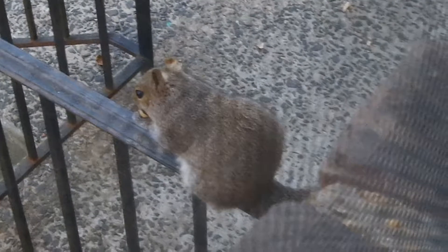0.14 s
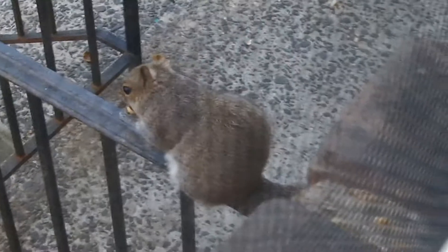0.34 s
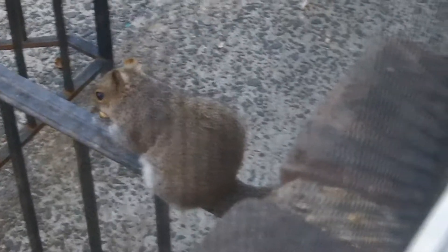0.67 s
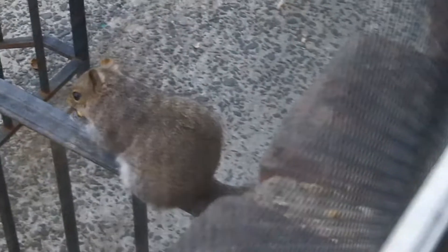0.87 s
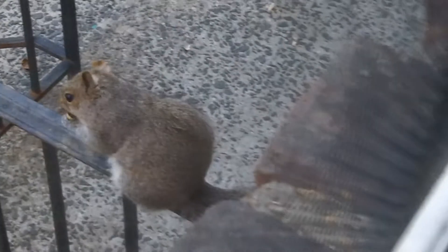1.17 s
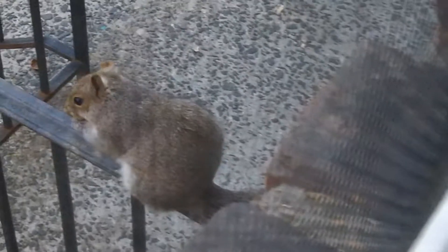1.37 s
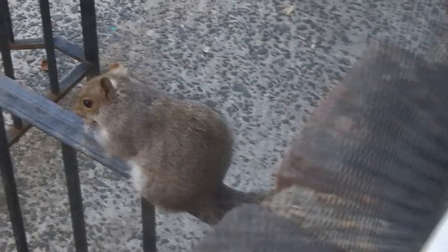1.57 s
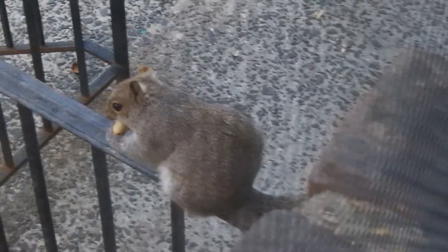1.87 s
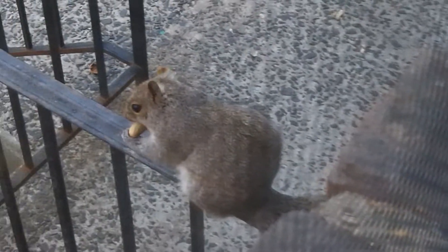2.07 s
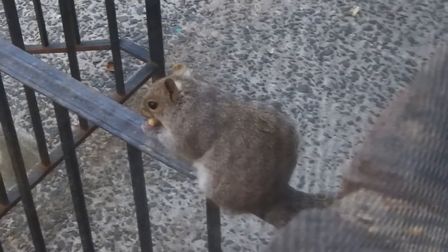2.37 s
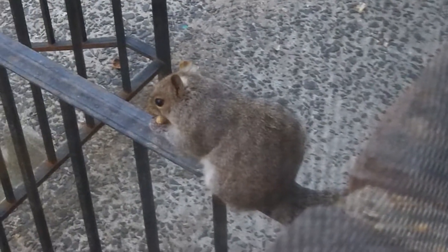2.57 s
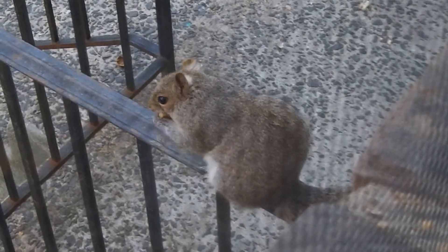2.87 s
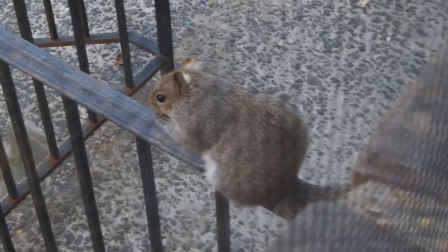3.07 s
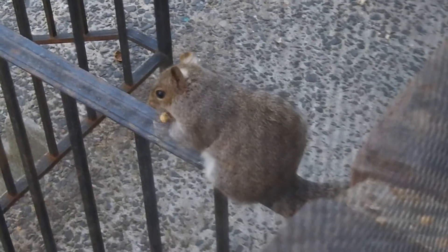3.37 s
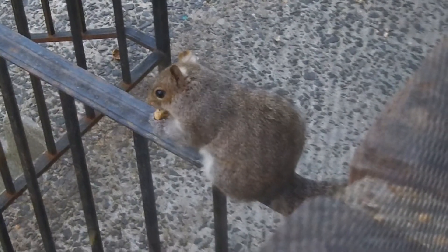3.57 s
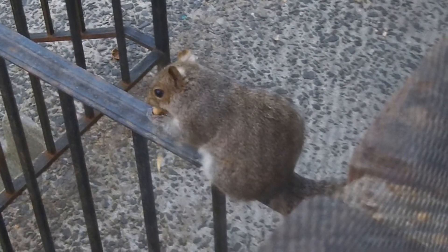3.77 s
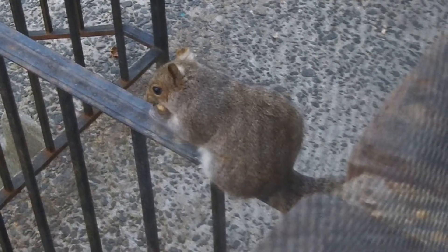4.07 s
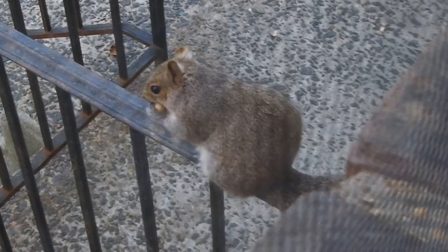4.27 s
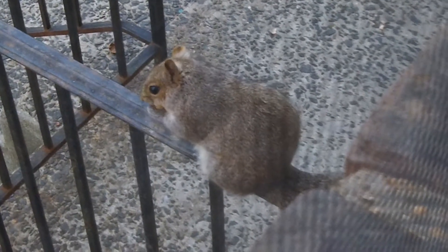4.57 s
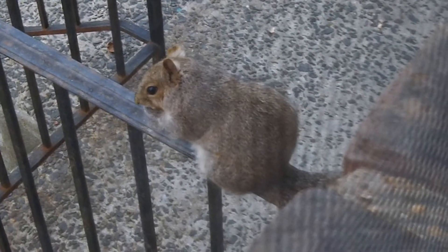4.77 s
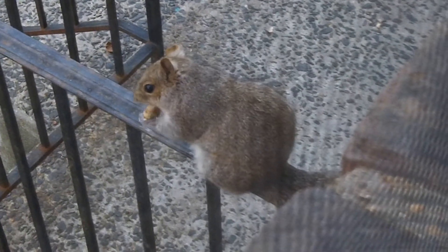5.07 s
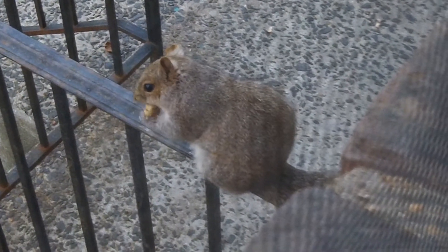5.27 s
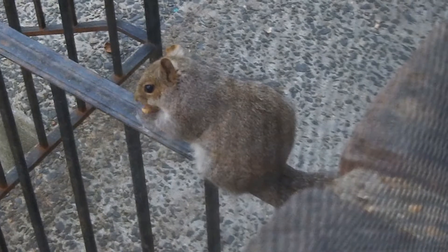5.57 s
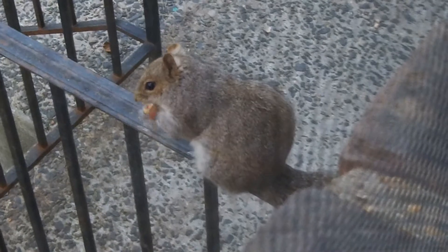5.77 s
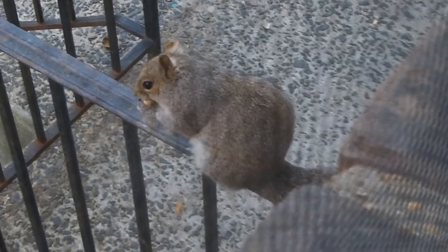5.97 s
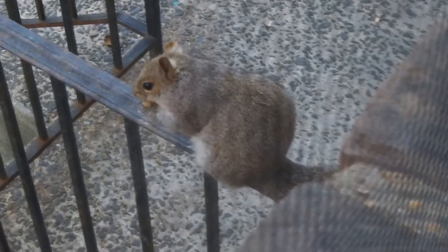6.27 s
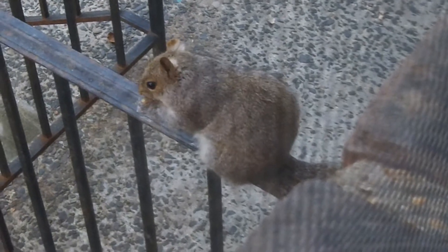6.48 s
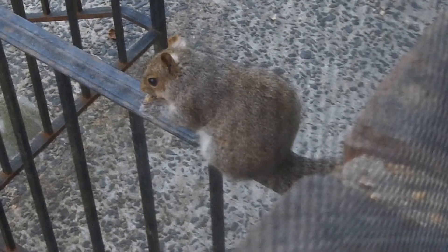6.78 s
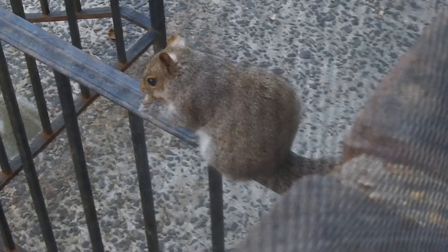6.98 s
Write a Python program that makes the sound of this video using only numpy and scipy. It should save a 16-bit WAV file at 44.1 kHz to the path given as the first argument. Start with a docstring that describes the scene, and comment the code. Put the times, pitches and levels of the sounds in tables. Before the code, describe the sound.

A squirrel on a railing works at a peanut: short dry scrapes first, then sharp bright shell cracks in clusters with small outdoor echoes. A thin bird whistle and blurred far calls sit behind, over steady air and low town hum. Small knocks occur early and late; one enormous close knock near six seconds overloads the microphone, and the sound ducks briefly before recovering.

```python
"""A squirrel on a railing works at a peanut just outside a window: the dry shell breaks in short rings with
scattered echoes, crumbles in coloured impulses and scrapes by stick and slip through resonances.
Knocks near the microphone are falling tones with a crack; the last, by far the loudest, overloads it, and
the gain control ducks and recovers. Behind are small birds, a whistle and far calls of gliding narrow noise,
over a low town hum of resonated noise and steady air."""
import sys
import numpy as np
from scipy import signal
from scipy.fft import rfft, irfft, next_fast_len
from scipy.io import wavfile
from scipy.ndimage import map_coordinates

SR = 44100
rng = np.random.default_rng(int(sys.argv[2]) if len(sys.argv) > 2 else 0)


def dump_mix(stems):
    """Bounce the given channels to the path in sys.argv[1] as a 16-bit WAV at rate SR."""
    frames = np.atleast_2d(stems).T  # one column per channel
    limited = np.clip(frames, -1, 1)  # hard clip at full scale
    pcm = np.round(limited * 32767).astype(np.int16)
    wavfile.write(sys.argv[1], SR, pcm)


N = 314433

# relative spectrum of breaking shell: f/Hz, level/dB
SHELL_SPECTRUM = [(300, -35), (1300, -26.5), (2000, -11), (2500, -6), (3500, -3.5), (4900, -1), (6800, -3),
                  (7700, -2), (9000, -5), (11500, -7.5), (13000, -11), (16000, -18)]
# teeth pressing into the shell: middle t/s, length/s, crumbling level/dB, splinter level/dB before the snap gain
BITES = [(2.479, .08, -53, -19.5), (3.066, .03, -46, -21.5), (3.129, 0.031, -48, -15.5),
         (3.18, .028, -52, -18.5), (4.261, 0.11, -45, -30.5), (4.44, .057, -40.5, -30),
         (4.863, 0.053, -57, -28), (5.332, .045, -49, -43), (5.564, 0.034, -52, -31.5),
         (6.119, .012, -44.5, -31), (6.792, 0.027, -49, -37)]


def amp(db):
    """Amplitude ratio of a level in dB."""
    return 10 ** (np.asarray(db) / 20)


def unit(x):
    """x scaled to rms 1."""
    return x / np.sqrt(np.mean(x ** 2) + 1e-20)


def along(points, f_hz):
    """(Hz, value) points interpolated on a log frequency axis."""
    f, v = np.transpose(points)
    return np.interp(np.log(f_hz + 1), np.log(f + 1), v)


def clock():
    """The time of every sample, s."""
    return np.arange(N) / SR


def wobble(rate_hz):
    """A smooth random curve, rate_hz knots a second."""
    knots = rng.standard_normal(int(N * rate_hz / SR) + 4)
    return map_coordinates(knots, [np.arange(N) * rate_hz / SR])


def filtered(x, response):
    """x times a complex response of frequency."""
    m = next_fast_len(len(x) + SR // 4)
    return irfft(rfft(x, m) * response(np.fft.rfftfreq(m, 1 / SR)), m)[:len(x)]


def resonate(x, modes):
    """x through a parallel bank of (Hz, width Hz, dB) resonances."""
    def bank(f):
        return sum(amp(db) * 1j * f * w / (c * c - f * f + 1j * f * w) for c, w, db in modes)
    return filtered(x, bank)


def causal(db):
    """Minimum-phase impulse response with this gain on an even grid up to SR / 2."""
    cepstrum = irfft(np.log(amp(db) + 1e-6))
    half = len(cepstrum) // 2
    fold = np.r_[1, np.full(half - 1, 2), 1, np.zeros(half - 1)]
    return irfft(np.exp(rfft(cepstrum * fold)))


def coloured(x, points):
    """x with every impulse given a (Hz, dB) colour."""
    response = causal(along(points, np.linspace(0, SR / 2, 513)))
    return signal.fftconvolve(x, response)[:len(x)]


def swell(t, length_s):
    """A rounded rise and fall around t = 0."""
    return np.exp(-np.abs(2 * t / length_s) ** 3)


def strokes(rows):
    """The joint envelope of (middle, length, dB) strokes, summed in energy."""
    t = clock()
    return np.sqrt(sum((amp(db) * swell(t - s, length)) ** 2 for s, length, db in rows))


def slips(rate_hz, spread_db):
    """Random tiny impulses of unequal size and either sign."""
    hit = rng.random(N) < rate_hz / SR
    sign = np.sign(rng.standard_normal(N))
    return hit * sign * amp(spread_db * np.clip(rng.standard_normal(N), -2, 2))


def echo(x, t60_s):
    """Diffuse scatter: decaying coloured noise of energy 1, new for every third of a second."""
    # relative spectrum of scatter from the railing and wall: f/Hz, level/dB
    scatter = [(300, -31), (1500, 5.5), (4500, -3.5), (7000, -5.5), (10000, -8), (16000, -15.5)]
    t, out, step = np.arange(SR // 2) / SR, np.zeros(N + SR), SR // 3
    for i in range(0, N, step):
        noise = filtered(rng.standard_normal(len(t)), lambda f: amp(along(scatter, f)))
        tail = noise * amp(-60 * t / t60_s)
        part = signal.fftconvolve(x[i:i + step], tail / np.linalg.norm(tail))
        out[i:i + len(part)] += part
    return out[:N]


def town(air_db=-42.0, air_vary_db=0.19):
    """Steady outdoor air is shaped noise; the low hum is noise through resonances, slowly swelling."""
    # relative spectrum of the air: f/Hz, level/dB
    air_spectrum = [(13, -45), (22, -5), (107, -3), (166, -1.5), (243, -2), (408, -7), (582, -8.5),
                    (853, -9.5), (2690, -16.5), (3000, -17), (5770, -25), (6610, -25.5), (8230, -30),
                    (8930, -28), (15000, -32)]
    # hum resonances: f/Hz, width/Hz, relative level/dB
    hum_modes = [(84, 11.6, -4), (174.7, 12.3, 2), (234.5, 11.7, 1), (835, 95, -17.5)]
    # hum swell: t/s, rms level/dB
    hum_level = [(0, -50.5), (2.1, -49.5), (2.7, -46), (3.4, -47), (4.2, -46), (4.8, -47.5), (7.13, -46.5)]
    air = unit(filtered(rng.standard_normal(N), lambda f: amp(along(air_spectrum, f))))
    hum = unit(resonate(rng.standard_normal(N), hum_modes))
    hum_db = np.interp(clock(), *np.transpose(hum_level))
    return air * amp(air_db + air_vary_db * wobble(5)) + hum * amp(hum_db)


def chirp(length_s, f_hz, glide_hz, width_hz):
    """Half a second centred on one note of narrow noise, its spectrum gliding under a rounded envelope."""
    u = np.arange(-SR // 4, SR // 4) / SR
    blur = filtered(rng.standard_normal(len(u)), lambda f: 1 / (1 + (2 * (f - f_hz) / width_hz) ** 2))
    shape = swell(u, length_s)
    glide = np.exp(1j * np.pi * glide_hz / length_s * u ** 2)
    call = shape * np.real(signal.hilbert(blur) * glide)
    return call * np.linalg.norm(shape) / np.linalg.norm(call)  # rms 1 under the envelope


def whistle(wet_db=-7, flutter_db=2):
    """One thin rising bird whistle: a sine with unsteady pitch and level, and its echo."""
    # whistle course: t/s, f/Hz, rms level/dB; pitch and level then flutter
    course = [(1.165, 6100, -70), (1.19, 6280, -34), (1.225, 6690, -38), (1.26, 6600, -44),
              (1.31, 6700, -50), (1.34, 6700, -42), (1.39, 7500, -56)]
    t = clock()
    s, hz, db = np.transpose(course)
    pitch_hz = np.interp(t, s, hz) * (1 + .004 * wobble(150))
    level = amp(np.interp(t, s, db, left=-120, right=-120) + flutter_db * wobble(71))
    tone = np.sqrt(2) * level * np.sin(2 * np.pi * np.cumsum(pitch_hz) / SR)
    return tone + amp(wet_db) * echo(tone, t60_s=0.43)


def far_calls(wet_db=-6, octave_db=-9.5, octave_width_hz=2900, octave_stretch=1.7, octave_top_hz=7700):
    """Far bird calls blurred by the houses: narrow noise, a longer, wider octave if low enough, and echo."""
    # calls: middle t/s, length/s, f/Hz, glide/Hz over the length, width/Hz, level/dB
    calls = [(.535, 0.068, 4000, -700, 900, -47), (1.041, 0.1, 3180, -2, 450, -41.5),
             (3.78, 0.12, 8530, -100, 220, -57.5), (3.789, 0.18, 3100, 2, 600, -51),
             (3.91, 0.065, 3230, 32, 50, -46), (4.002, .028, 3690, 100, 60, -43.5),
             (4.047, .08, 3093, 0, 25, -43), (4.045, 0.045, 3450, -2, 30, -42.5),
             (4.09, 0.14, 6550, 100, 200, -50.5), (4.106, 0.25, 3380, 0, 1800, -50),
             (4.187, .06, 3692, 0, 160, -44), (5.145, 0.23, 6400, 600, 40, -66),
             (5.6, 0.12, 3950, -200, 1100, -49.5)]
    far = np.zeros(N + SR)
    for middle, length, hz, glide_hz, width_hz, db in calls:
        octave = chirp(octave_stretch * length, 2 * hz, 2 * glide_hz, octave_width_hz)
        call = chirp(length, hz, glide_hz, width_hz)
        call = call + amp(octave_db) * octave * (2 * hz < octave_top_hz)
        far[round(middle * SR) - SR // 4:][:len(call)] += amp(db) * call
    far = far[:N]
    return far + amp(wet_db) * echo(far, t60_s=0.23)


def knocks(body_db=-21, body_t60_s=0.019, sag=0.44, sag_s=.00014, attack_s=.00009,
           overtone=2.27, overtone_db=-10):
    """A hard contact close by: a crack, a short ring falling in pitch as the contact eases, a dull after-sound."""
    # knocks: t/s, level/dB, settled f/Hz, ring t60/s, crack level/dB relative to the knock
    contacts = [(1.2592, -11, 1580, 0.0028, -14), (1.3435, -20, 1900, 0.0023, -6),
                (5.619, -15, 1440, 0.0025, -14), (6.1782, 19.5, 1970, 0.0017, -20.5)]
    # relative spectrum of the crack: f/Hz, level/dB
    crack_spectrum = [(150, 24), (1000, 12), (3000, -16), (6500, 9.5), (10000, 2), (15000, -18)]
    out, t = np.zeros(N + SR), np.arange(SR // 20) / SR
    for s, db, hz, t60_s, crack_db in contacts:
        phase = 2 * np.pi * np.cumsum(hz * (1 + sag * np.exp(-t / sag_s))) / SR
        modes = np.sin(phase) + amp(overtone_db) * np.sin(2 * np.pi * overtone * hz * t)
        ring = modes * amp(-60 * t / t60_s) * (1 - np.exp(-t / attack_s))
        crack = coloured(t == 0, crack_spectrum)
        crack = amp(crack_db) * crack / np.abs(crack).max()
        dull = unit(resonate(rng.standard_normal(len(t)), [(835, 540, 0)]))
        body = dull * amp(body_db - 60 * t / body_t60_s)
        out[round(s * SR):][:len(t)] += amp(db) * (ring + crack + body)
    return out[:N]


def pressure(rows, fitful, graze_db=-15, graze_top_db=-53.5, graze_s=.12):
    """Firm (middle, length, dB) strokes, each inside a lighter, fitful graze with a capped level."""
    graze = strokes([(s, graze_s, db + graze_db) for s, length, db in rows])
    return np.hypot(strokes(rows), np.minimum(graze, amp(graze_top_db)) * fitful)


def scrapes(split_hz=4000, grain_db=3.0, crackle_db=-4, graze_vary_db=5):
    """Dense stick and slip with a few coarser catches rings resonances; a crisper stroke has more treble."""
    # firm rubbing strokes: middle t/s, length/s, level/dB, added treble/dB
    rubs = [(0.047, 0.16, -41.5, -1), (0.056, 0.0083, -29.5, -0.5), (.374, 0.038, -34.5, 0),
            (0.577, 0.046, -39.5, 1), (.617, 0.0086, -30, -13), (0.778, 0.049, -46, 6),
            (1.03, 0.19, -41, -1), (1.125, .1, -33.5, 2), (1.232, 0.052, -32, -4.5),
            (1.338, 0.055, -36, -0.5), (1.667, 0.074, -31, -1.5), (1.704, 0.032, -20, -1),
            (1.83, 0.033, -39, 3), (2.02, 0.019, -33, -2.5), (2.098, 0.041, -30.5, -1),
            (2.181, 0.012, -26, 3.5), (2.201, 0.029, -22.5, -3), (2.231, 0.018, -27, -2.5),
            (2.263, 0.012, -28.5, -2), (2.31, 0.12, -41.5, -4), (2.474, .019, -37, 6),
            (2.978, 0.011, -40, -2), (3.462, 0.096, -42.5, -3), (3.575, 0.026, -33.5, -7),
            (4.128, 0.018, -39, -8), (4.202, .018, -36, 1), (4.233, 0.027, -35.5, 2),
            (4.397, 0.012, -34, 2), (5.76, 0.053, -32, 1), (6.07, 0.04, -41, -10),
            (6.352, .015, -28.5, -8.5), (6.448, .027, -38, -11), (6.633, 0.076, -37.5, -18),
            (6.713, 0.021, -32, -4)]
    # relative spectrum of a slip: f/Hz, level/dB
    slip_spectrum = [(150, -26.5), (400, -7.5), (600, -1.5), (1000, -2), (1600, -1), (2100, -0.5),
                     (2500, -3), (3600, 1), (4900, -11.5), (5900, -4), (7300, -13.5), (10500, -10),
                     (12000, -10.5), (13200, -22), (16000, -30)]
    # resonances under the rubbing: f/Hz, width/Hz, level/dB
    rub_modes = [(865, 140, 2), (1354, 280, 0), (2450, 170, 1.5)]
    fine = unit(slips(rate_hz=14000, spread_db=5.5) * amp(grain_db * wobble(350)))
    catches = unit(slips(rate_hz=600, spread_db=5))
    rub = coloured(fine + amp(crackle_db) * catches, slip_spectrum)
    rub = unit(rub + resonate(rub, rub_modes))
    body = filtered(rub, lambda f: 1 / (1 + (f / split_hz) ** 2))
    fitful = amp(graze_vary_db * wobble(60))
    dull = pressure([(s, length, db) for s, length, db, bright in rubs], fitful)
    crisp = pressure([(s, length, db + bright) for s, length, db, bright in rubs], fitful)
    return body * dull + (rub - body) * crisp


def crumbles():
    """Many faint fibres give way between the louder snaps: shell-coloured impulses under the bites."""
    grains = unit(coloured(slips(rate_hz=1500, spread_db=12.0), SHELL_SPECTRUM))
    return grains * strokes([(s, length, db) for s, length, db, _ in BITES])


def splinters(count=24, rate_hz=150, pitch_hz=4700, vary_db=3, vary_octaves=0.19, edge_db=-4):
    """Rows of (s, dB, Hz, edge dB): each bite sheds small dull-edged snaps at an uneven pace."""
    rows = []
    for (middle, length, _, db), luck in zip(BITES, rng.standard_normal((len(BITES), count, 3))):
        after_s = (np.arange(count) + .5 + .3 * luck[:, 0]) / rate_hz
        level_db = db + vary_db * luck[:, 1]
        pitch = pitch_hz * 2 ** (vary_octaves * luck[:, 2])
        run = np.c_[middle - length / 2 + after_s, level_db, pitch, np.full(count, edge_db)]
        rows += list(run[after_s < length])
    return rows


def snaps(gain_db=6.0, ring_db=5, ring_octaves=0.39, vary_db=2.0, body_vary_db=3.5, near_db=-7.0, yard_db=-13.5):
    """Each fibre stresses its own part of the shell's spectrum; near surfaces and the yard answer."""
    # loudest fibres breaking: t/s, level/dB before gain_db, f/Hz, treble edge/dB
    fibres = [(0.052, -17.5, 3600, 7), (.618, -19, 2800, 3), (1.1267, -18, 2900, 4), (1.1405, -15, 3500, 5),
              (1.2592, -10.5, 3200, 3), (1.3437, -13.5, 3420, -5), (1.7065, -17, 3400, 15),
              (1.7097, -24, 3400, 5), (2.178, -16, 2900, 22), (2.182, -8, 3400, 12),
              (2.4248, -3.5, 5360, -5), (2.427, -11, 5130, 6), (2.474, -13, 5200, 2),
              (2.5023, -13, 5400, 3), (2.525, -8.5, 5250, -17), (2.5327, -3.5, 5260, 0),
              (2.5367, -13, 5200, 12), (2.5407, -14, 4800, -8), (3.0948, -8, 4490, -2),
              (3.098, -13, 5200, -3), (3.1205, -8, 4700, -8), (3.128, -20, 4580, -3),
              (3.1441, -5, 4870, 0.5), (3.178, -12, 5400, -2), (3.1834, -8, 6500, -3),
              (3.2103, -8, 4400, 4), (3.4166, -9, 5600, 2), (3.421, -10.5, 5600, 8),
              (4.239, -15.5, 4200, 4), (4.27, -19, 6400, -7), (4.2736, -11, 6440, -2),
              (4.4287, -12.5, 6200, 10), (4.4363, -14, 6700, 6), (4.4728, -18, 4470, 1),
              (4.6665, -12.5, 5330, 1), (4.8803, -21.5, 4850, -6), (4.939, -12, 5400, 5.5),
              (4.954, -10, 7300, 9.5), (6.623, -13, 4500, 5), (6.6566, -17, 4570, 5),
              (6.7178, -14.5, 3600, 7)]
    # mean body of a piece by its pitch: f/Hz, body level/dB
    body_by_pitch = [(3400, 11.5), (4400, 8.5), (4800, -7.5), (5300, -4), (7000, -4.5)]
    out, f = np.zeros(N + SR), np.fft.rfftfreq(512, 1 / SR) + 1
    for (s, db, hz, edge_db), luck in zip(list(fibres) + splinters(), rng.standard_normal(size=(300, 14))):
        ring = ring_db * np.exp(-(np.log2(f / hz) / ring_octaves) ** 2)
        # thick, low pieces add body; a clean break adds edge
        body_db = along(body_by_pitch, hz) + body_vary_db * luck[0]
        shape = along([(2700, body_db), (4400, 0), (7000, 0), (9500, edge_db)], f)
        chance = vary_db * np.interp(f, np.linspace(0, SR / 2, len(luck)), luck)
        crack = causal(along(SHELL_SPECTRUM, f) + ring + shape + chance)
        out[round(s * SR):][:len(crack)] += amp(db + gain_db) * crack / np.linalg.norm(crack)
    direct = out[:N]
    return direct + amp(near_db) * echo(direct, t60_s=0.033) + amp(yard_db) * echo(direct, t60_s=0.49)


def scene():
    """The town, the birds, the knocks and the squirrel's rubbing, crumbling and snaps, in mono."""
    background = town() + whistle() + far_calls()
    return (background + knocks() + scrapes() + crumbles() + snaps())[None]


def gain_control(x, threshold_db=3, ratio=4, max_cut_db=23, release_db_per_s=142, attack_s=0.0021):
    """An overload quickly pulls the gain down, ratio dB per dB over; it climbs back at a steady dB rate."""
    over_db = ratio * np.maximum(20 * np.log10(np.abs(x) + 1e-9) - threshold_db, 0)
    climb_db = release_db_per_s * clock()
    cut_db = np.maximum.accumulate(np.minimum(over_db, max_cut_db) + climb_db) - climb_db
    keep = np.exp(-1 / (attack_s * SR))
    return x * amp(-signal.lfilter([1 - keep], [1, -keep], cut_db))


def record(dry, clip_level=.72, notch_hz=8050, notch_width_hz=330, top_hz=15700):
    """Gain control, soft clipping, a narrow double notch near 8 kHz and a steep band limit."""
    x = gain_control(dry[0])
    x = x / (1 + np.abs(x / clip_level) ** 5) ** (1 / 5)

    def response(f):
        away = notch_hz ** 2 - f * f
        notch = away / (away + 1j * f * notch_width_hz)
        return notch ** 2 / (1 + (f / top_hz) ** 80)
    return filtered(x, response)[None]


dry = scene()
out = record(dry)
dump_mix(out)
```